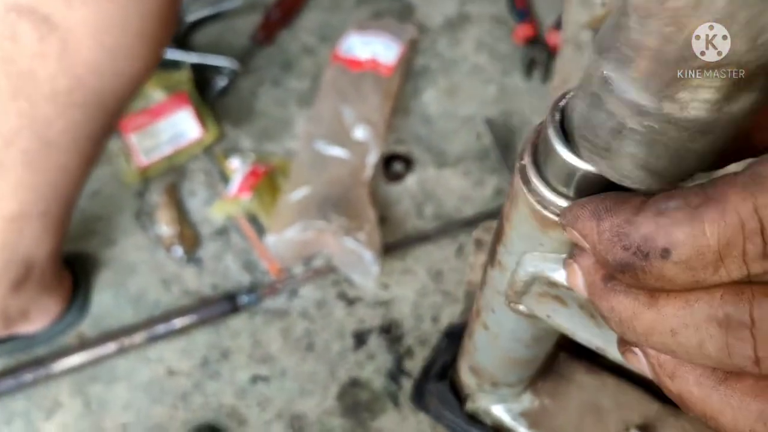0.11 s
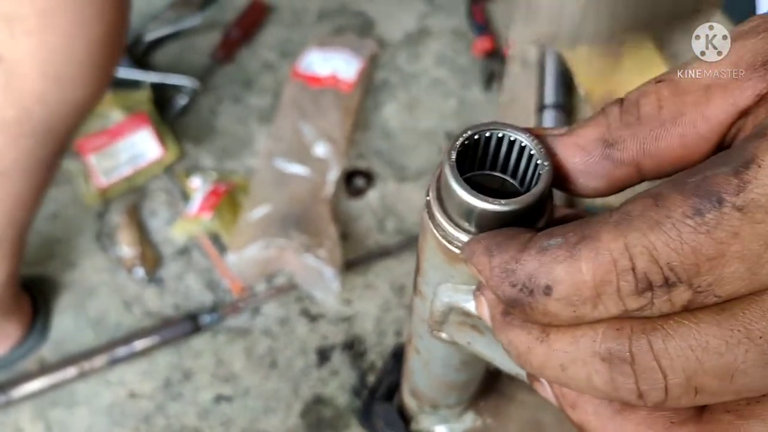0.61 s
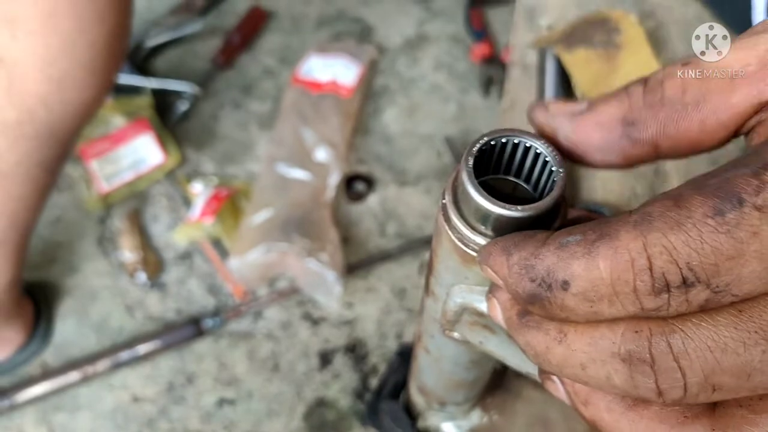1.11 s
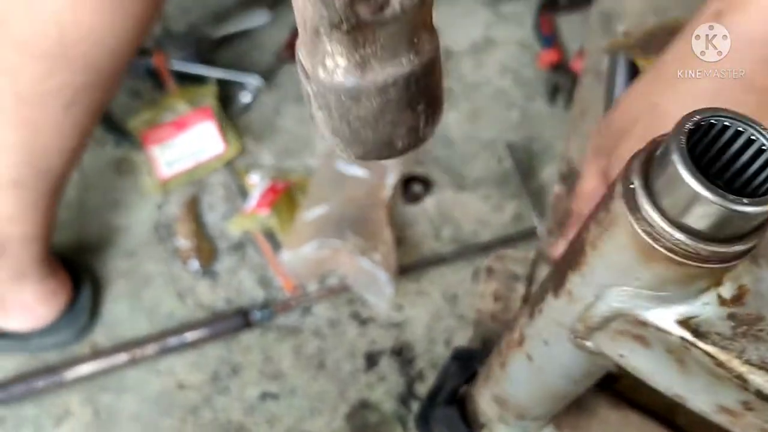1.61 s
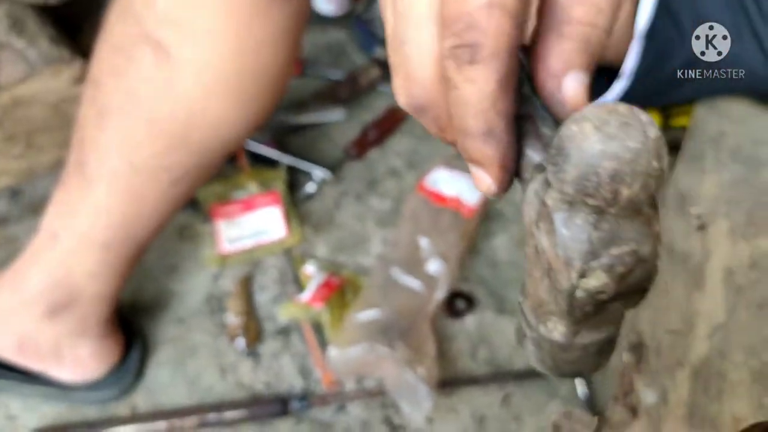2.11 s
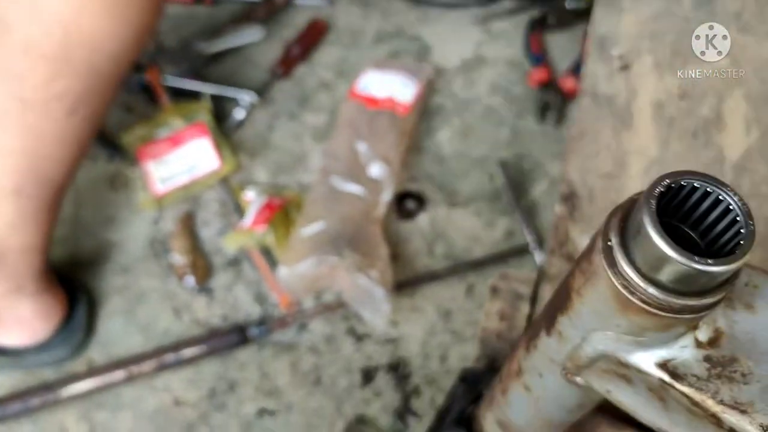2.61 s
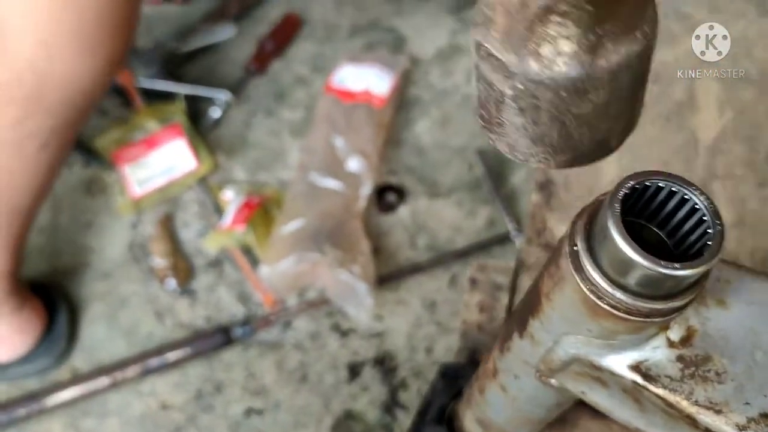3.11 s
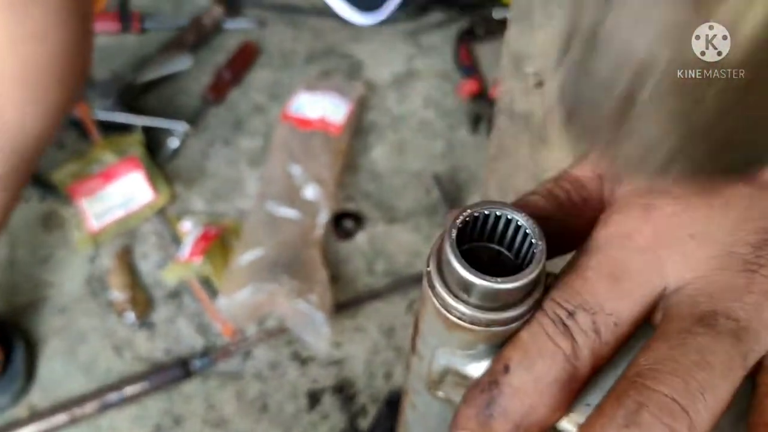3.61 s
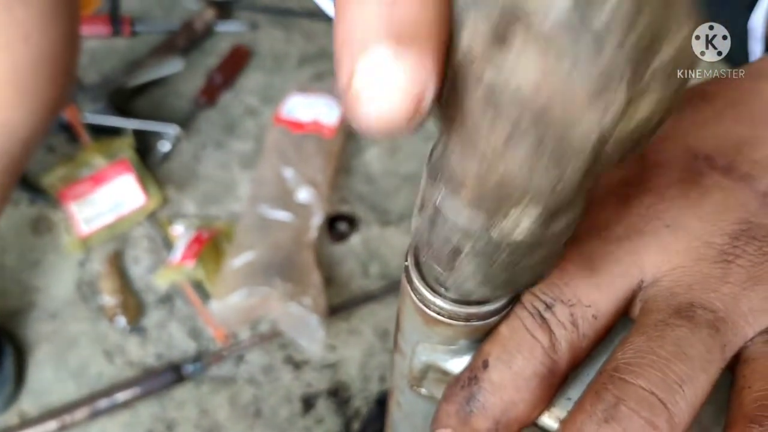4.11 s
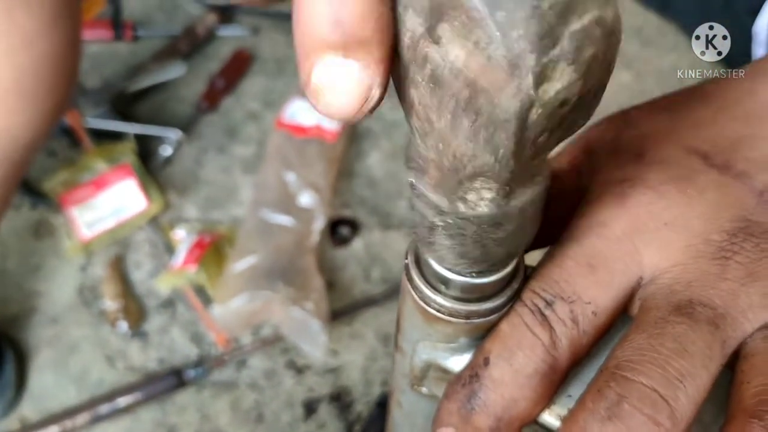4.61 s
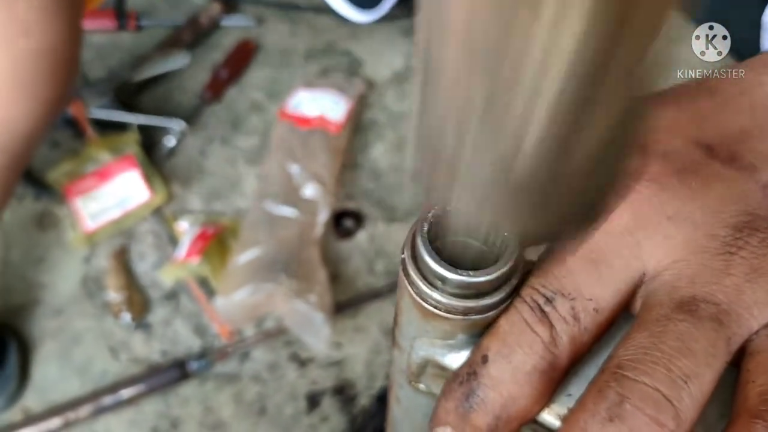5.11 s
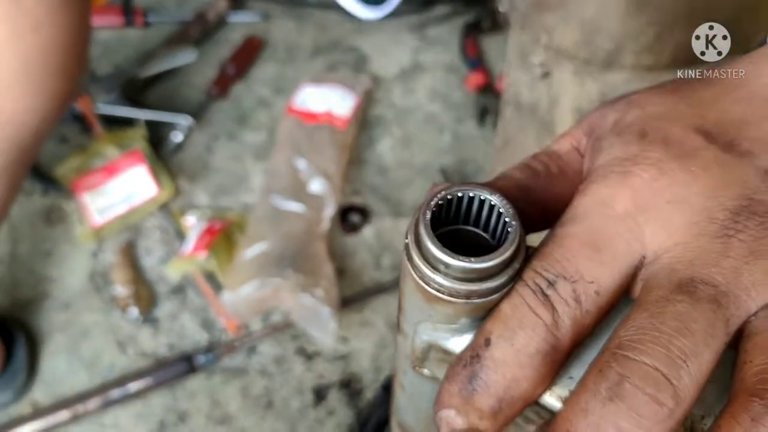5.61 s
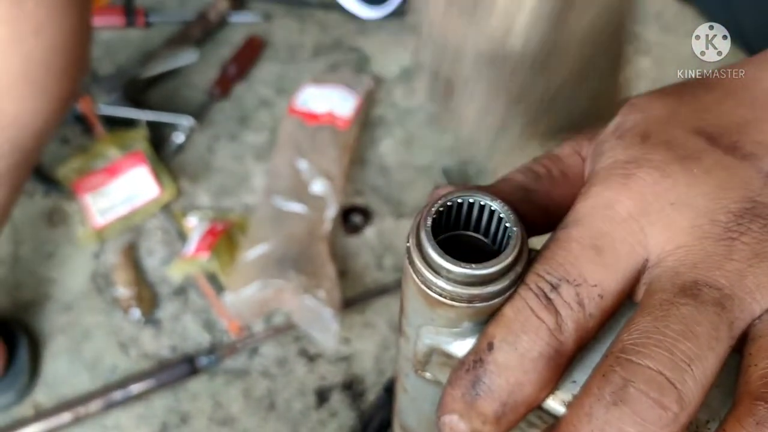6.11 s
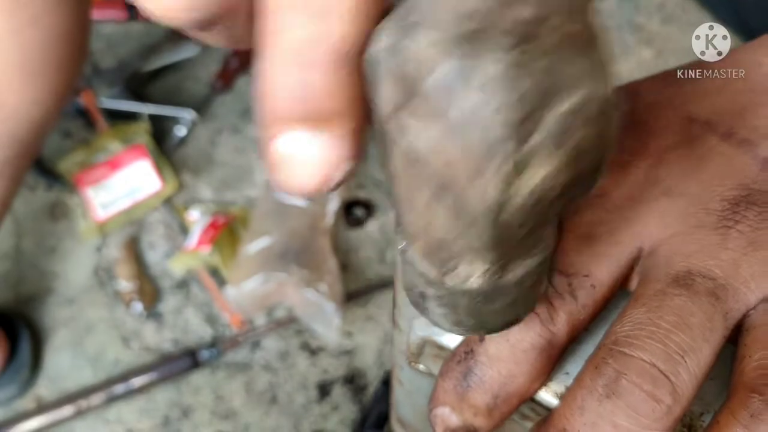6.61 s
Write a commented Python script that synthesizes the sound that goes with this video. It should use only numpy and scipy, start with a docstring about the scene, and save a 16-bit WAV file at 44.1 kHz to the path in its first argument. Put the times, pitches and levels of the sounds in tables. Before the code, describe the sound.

Rapid metallic hammering, heard very near in stereo with short, dense room reflections. The first second has hollow, clanking blows and a ringing bearing. Then about two and a half seconds of light handling: dull small knocks, rustling, a small tool clinking, weak squeaks. Regular hammer blows return, tighter and drier as the bearing seats, over a barely audible low floor with hum.

```python
"""A hammer drives a needle bearing into the steel pivot tube of a frame, close by in a small workshop. Each
blow is a hard contact with a short rattle: noise bursts that ring the modes of tube and frame. Once the loose
bearing jumps, knocks as it bounces, and rings free: single clicks set its modes ringing. In the pause hands
shift the frame and tools: small knocks, clinks, squeaks and rustle, from shaped noise and tones. Noise
reflections make the room; below it all lies a very quiet floor with hum."""
import sys
import numpy as np
from scipy import signal
from scipy.fft import rfft, irfft, next_fast_len
from scipy.io import wavfile
from scipy.ndimage import uniform_filter1d

SR = 44100
rng = np.random.default_rng(int(sys.argv[2]) if len(sys.argv) > 2 else 0)


def volts_from_db(level):
    """Convert decibel levels to linear amplitude ratios."""
    exponent = np.asarray(level, float) / 20
    return 10 ** exponent


def wrap_up_sound(samples):
    """Save the sound to the file named by the first command line argument, as 16-bit audio."""
    columns = np.atleast_2d(samples).T
    # keep every value between -1 and 1, then stretch to whole-number steps
    tamed = np.clip(columns, -1, 1)
    steps = np.round(tamed * 32767).astype(np.int16)
    wavfile.write(sys.argv[1], SR, steps)


N = 297675
LEAD = round(.15 * SR)   # samples computed before the start, so that an earlier blow can die away


def at_hz(points, hz, axis=1):
    """Reads a table at one or more pitches, with straight lines on a log-frequency axis."""
    points = np.array(points, float)
    return np.interp(np.log(hz), np.log(points[:, 0]), points[:, axis])


def band(x, low_hz, high_hz):
    """Butterworth band-pass: keeps what lies between two frequencies."""
    return signal.sosfilt(signal.butter(2, [low_hz, high_hz], "band", fs=SR, output="sos"), x)


def half_octaves():
    """Lower edge, upper edge and middle (Hz) of bands half an octave wide."""
    edges = 25 * 2 ** np.arange(0, 9.6, .5)
    return [(low, high, np.sqrt(low * high)) for low, high in zip(edges, edges[1:])]


def ring(force, hz, t60):
    """One mode: a unit click sets a sine of height 1 ringing, which fades by 60 dB in t60 seconds."""
    r, w = volts_from_db(-60 / (t60 * SR)), 2 * np.pi * hz / SR
    # the tiny constant keeps the filter away from very slow, near-zero numbers
    return signal.lfilter([0, np.sin(w)], [1, -2 * r * np.cos(w), r * r], force + 1e-18)


def place(times, shapes):
    """Lays one short shape at each time on a line that starts early."""
    length = shapes.shape[1]
    line = np.zeros(LEAD + N + length)
    starts = np.round(np.array(times) * SR).astype(int) + LEAD
    np.add.at(line, starts[:, None] + np.arange(length), shapes)
    return line[:LEAD + N]


def sides(x, spread_db, count=4):
    """A vibration pattern radiates unevenly and may reach the right microphone a few samples later."""
    lean_db, lag = rng.normal(0, spread_db), rng.integers(0, count)
    return np.array([volts_from_db(lean_db / 2) * x, volts_from_db(-lean_db / 2) * np.roll(x, lag)])


def strike(touches, modes, scatter_db, count=4):
    """Single clicks ring every mode of a body; scatter_db varies the strength from mode to mode."""
    s, level_db = np.transpose(touches)
    out = 0
    for hz, mode_db, t60 in modes:
        clicks = volts_from_db(level_db + mode_db + rng.normal(0, scatter_db, len(s)))
        out = out + sides(ring(place(s, clicks[:, None]), hz, t60), scatter_db, count=count)
    return out


# tilt of the noise floor: f/Hz, level/dB (per Hz, relative)
FLOOR_COLOUR = [(18, -34.5), (30, -10), (252, -6), (666, -15), (2750, -21), (3140, -35), (8080, -37.5),
                (12300, -29), (16000, -28.5)]
# mains hum tones: f/Hz, level/dB (peak of the sine)
HUM_TONES = [(49, -87), (100, -100), (151, -104), (251, -84)]
FLOOR_DB = -80.5   # rms of the noise


def quiet():
    """Faint noise floor, mostly low, with mains hum as a few steady sines."""
    hz = np.fft.rfftfreq(N, 1 / SR) + 1
    noise = irfft(rfft(rng.standard_normal((2, N))) * volts_from_db(at_hz(FLOOR_COLOUR, hz)), N)
    t, hum = np.arange(N) / SR, 0
    for f, level_db in HUM_TONES:
        hum = hum + volts_from_db(level_db) * np.sin(2 * np.pi * f * t + rng.uniform(0, 2 * np.pi, (2, 1)))
    return volts_from_db(FLOOR_DB) * noise / noise.std() + hum


# how the room answers: f/Hz, level/dB (relative), t60/s (time to fade by 60 dB)
ROOM_ECHO = [(40, -10.5, 0.26), (201, -2, 0.23), (700, 6, 0.17), (2820, -6.5, 0.17), (6800, 1.5, .14),
             (11000, -3, 0.11), (15000, 1, 0.14)]


def workshop(x):
    """Dense reflections from floor and clutter: noise dying band by band, another for each microphone."""
    t, echo = np.arange(round(.5 * SR)) / SR, 0
    for low, high, hz in half_octaves():
        t60 = at_hz(ROOM_ECHO, hz, axis=2)
        fade = volts_from_db(at_hz(ROOM_ECHO, hz) - 60 * t / t60) * np.clip(t / 0.0016, 0, 1)
        per_energy = np.sqrt(t60 * SR / (6 * np.log(10)))   # a longer fade does not make it louder
        echo = echo + band(rng.standard_normal((2, len(t))), low, high) * fade / per_energy
    size = next_fast_len(x.shape[1] + len(t))
    return irfft(rfft(x.mean(axis=0), size) * rfft(echo, size), size)[:, :x.shape[1]]


JOLT_DB, JOLT_HZ = -55, (20, 60)   # relative strength and band of the push


def jolts():
    """Each blow shakes the floor under the microphones: a short low push, unrelated at the two."""
    s = np.transpose(BLOW_LIST)[0]
    pushes = volts_from_db(JOLT_DB) * rng.standard_normal((len(s), 2))
    low_hz, high_hz = JOLT_HZ
    return np.array([band(place(s, push[:, None] * SR / high_hz), low_hz, high_hz) for push in pushes.T])


# hands and cloth brush past: start t/s, length/s, fine rustle level/dB, dry rubbing level/dB
BRUSH_LIST = [(1.298, 0.09, -55, -83), (1.51, .04, -90, -73.5), (1.71, .12, -72.5, -71.5),
              (1.829, 0.05, -68.5, -58), (1.913, .01, -50, -63), (1.95, 0.29, -65.5, -66.5),
              (2.273, 0.018, -60, -66), (2.326, 0.016, -58, -56.5), (2.43, 0.063, -56, -52.5),
              (2.638, 0.07, -80.5, -67), (2.75, 0.017, -76, -71), (3.042, 0.025, -59.5, -57.5),
              (3.097, 0.054, -77, -68), (3.164, 0.046, -57.5, -59.5), (3.29, .2, -95, -84),
              (3.469, 0.073, -70.5, -97.5), (3.59, .04, -92, -73)]
BRUSH_RISE_S, BRUSH_FADE_DB_PER_S, SCUFF_UNDER_RUB_DB = .012, 331, 20
FRAME_RUBS_PER_S, FRAME_RUB_DB = 300, -6   # the rubbing also sets the frame's modes murmuring


def rustle():
    """Dense tiny contacts under the hands, heard in three registers; each brush rises, holds and fades."""
    start, length, fine_db, rub_db = np.transpose(BRUSH_LIST)
    t, out = np.arange(N) / SR, 0
    coarse = np.arange(0, N, 32) / SR   # slow changes are worked out every 32 samples
    age = coarse - start[:, None]
    fade_db = BRUSH_FADE_DB_PER_S * np.maximum(age - length[:, None], 0)
    shape = np.clip(age / BRUSH_RISE_S, 0, 1) * volts_from_db(-fade_db)
    # scuff, rub and rustle: level, band (Hz), how alike the two microphones are
    registers = [(rub_db - SCUFF_UNDER_RUB_DB, 400, 2700, .7),
                 (rub_db, 2000, 5550, .4),
                 (fine_db, 5000, 19845, .2)]
    for level_db, low, high, alike in registers:
        # a few grains are far stronger than the rest
        grains = rng.standard_normal((3, N)) * volts_from_db(4.0 * np.minimum(rng.exponential(1, N), 4))
        steps = np.arange(0, 7, .03)
        patches_db = 5.0 * np.interp(t, steps, rng.standard_normal(len(steps)))   # contact comes and goes
        mixed = alike * grains[0] + (1 - alike) * grains[1:]
        x = volts_from_db(patches_db) * band(band(mixed, low, high), low, high)
        out = out + x / x.std() * np.interp(t, coarse, volts_from_db(level_db) @ shape)
    rubs = (rng.random(N) < FRAME_RUBS_PER_S / SR) * rng.standard_normal(N)
    rubbing = rubs * np.interp(t, coarse, volts_from_db(rub_db) @ shape)
    frame = sum(volts_from_db(mode_db + rng.normal(0, 3.0)) * ring(rubbing, hz, t60)
                for hz, mode_db, t60 in TUBE_MODES)
    return out + volts_from_db(FRAME_RUB_DB) * band(frame, 480, 9000)


# soft short tones: start t/s, length/s, level/dB (relative), from f/Hz, to f/Hz
SQUEAK_LIST = [(1.39, 0.054, -74, 720, 680), (1.507, 0.046, -66.5, 588, 570),
               (2.85, 0.26, -85.5, 1577, 1577), (3.083, 0.032, -60, 2800, 2800),
               (3.063, .15, -65.5, 1400, 1400), (3.118, .05, -66, 2350, 2350),
               (3.543, 0.055, -58, 1403, 1075)]


def squeaks():
    """Soft tones, some gliding, that swell and fade; slow random changes make their level unsteady."""
    out = np.zeros(LEAD + N)
    for s, length, level_db, from_hz, to_hz in SQUEAK_LIST:
        u = np.linspace(0, 1, round(length * SR))   # 0 at the start, 1 at the end
        points = len(u) // 250
        waver = 0.7 + np.interp(u, np.linspace(0, 1, points), rng.standard_normal(points))
        phase = 2 * np.pi * np.cumsum(from_hz + (to_hz - from_hz) * u) / SR
        swell = np.abs(np.sin(np.pi * u))
        out += place([s], (volts_from_db(level_db + 4) * swell * waver * np.sin(phase))[None])
    return out


# small knocks: up to 1.23 s the loose bearing bouncing, later things being shifted: t/s, level/dB (relative),
# f/Hz, brightness level/dB (relative)
KNOCK_LIST = [(1.033, -23, 700, -12.5), (1.048, -24, 666, -20), (1.056, -30, 595, 3),
              (1.186, -30, 1800, -8), (1.214, -35.5, 690, -5.5), (1.229, -38, 900, -14.5),
              (1.714, -45, 5000, -31), (1.842, -39, 660, -22), (1.866, -37, 710, -14),
              (1.914, -27, 4770, -17), (2.007, -44.5, 1630, -12.5), (2.054, -40, 860, -31),
              (2.141, -31.5, 810, -38), (2.161, -35, 716, -23), (2.194, -38, 800, -35),
              (2.278, -48.5, 1880, -16), (2.328, -40.5, 4190, -13), (2.419, -32.5, 1780, -33),
              (2.433, -30.5, 885, -30), (2.44, -35.5, 4550, -10), (2.463, -30.5, 1090, -16),
              (2.478, -43, 670, -3), (2.661, -41.5, 1990, -39), (2.709, -36, 1410, -35),
              (2.733, -41.5, 1420, -33), (2.757, -33.5, 1420, -32.5), (3.043, -34.5, 735, -13.5),
              (3.057, -48, 643, -2), (3.165, -51, 1400, -2.5)]
KNOCK_T60_S = .03   # fade of the weaker, longer part


def knocks():
    """Each knock is a scratchy tick on a dull body: noise dying in a broad resonance."""
    out = np.zeros(LEAD + N)
    t = np.arange(round(.15 * SR)) / SR
    fade = np.exp(-t / 0.0017) + volts_from_db(-19 - 60 * t / KNOCK_T60_S)
    for s, level_db, hz, bright_db in KNOCK_LIST:
        noise = rng.standard_normal((2, len(t))) * fade
        body = band(noise[0], hz / 1.4, hz * 1.485) * np.sqrt(SR / 2 / hz)
        tick = volts_from_db(bright_db + 13.5) * band(noise[1], 2400, 17000)
        out += place([s], volts_from_db(level_db - 3) * (body + tick)[None])
    return out


# a small tool is touched: t/s, level/dB
CLINK_TOUCHES = [(1.914, -47), (2.435, -40.5)]
# modes of the tool: f/Hz, level/dB (relative), t60/s
TOOL_MODES = [(4760, -7.5, 0.28), (12520, 7.5, 0.14)]


def clinks():
    """Light touches, each a single click, ring the modes of a small tool."""
    return strike(CLINK_TOUCHES, TOOL_MODES, scatter_db=2)


# touches of the loose bearing as it jumps: t/s, level/dB
BEARING_TOUCHES = [(1.036, -39), (1.057, -24.5), (1.123, -27), (1.187, -39.5)]
# modes of the bearing, the close pair beats: f/Hz, level/dB (relative), t60/s
BEARING_MODES = [(1696, -14, .3), (4460, -13, .22), (8651, 0, .2), (8666, -.5, .2), (14230, -6, .45)]


def loose_bearing():
    """The bearing jumps and rings free: every touch clicks all its modes, equally timed at both sides."""
    return strike(BEARING_TOUCHES, BEARING_MODES, scatter_db=.5, count=1)


# hammer blows: t/s, sizzle level/dB (hardness), tube ring level/dB, arm ring level/dB (all relative)
BLOW_LIST = [(0.0755, -30, -18, -32.5), (0.2488, -27, -13, -37), (0.4237, -29, -16, -34.5),
             (0.604, -21, -9, -37), (0.7783, -25, -15.5, -49), (0.9542, -30, -14.5, -40),
             (1.1219, -26.5, -8, -28), (3.6303, -24.5, -12, -33), (3.8212, -31.5, -12.5, -30.5),
             (4.0044, -26.5, -14.5, -34), (4.1908, -31.5, -20.5, -33.5), (4.37, -27, -11.5, -35),
             (4.5531, -30, -12, -37), (4.7349, -30, -15.5, -42), (4.9101, -28, -14.5, -45),
             (5.0898, -28.5, -16.5, -34), (5.2667, -25, -12.5, -35.5), (5.4454, -30, -17.5, -32),
             (5.6217, -28.5, -18.5, -30.5), (5.796, -28, -17, -33.5), (5.9742, -28, -14, -31),
             (6.148, -25.5, -13.5, -32.5), (6.3229, -33, -17, -29.5), (6.5521, -28.5, -13.5, -33.5),
             (6.7295, -25, -11.5, -28)]
# a blow before the start, only its tail is heard: same columns
BLOW_BEFORE = (-.1, -27, -12, -35)
# where thud, tube ring, clank and sizzle sit: f/Hz
COLOUR_HZ = [900, 3000, 6000, 11000]
# modes of tube and frame: f/Hz, level/dB (relative), t60/s
TUBE_MODES = [(172, -31, .15), (194, -16, .6), (245, -29, .3), (575, -16, .05), (640, -22, .04),
              (743, -8, .09), (790, -4, .06), (860, -10, .1), (960, -15, .04), (1440, -11, .04),
              (1523, -19, .04), (2153, -18, .07), (2347, -22, .04), (2676, -13, .05), (3498, -13, .04),
              (3639, -14, .06), (4075, -16, .04), (4290, -16, .06), (2826, -12, .08), (3035, 2, .04),
              (3124, -2, .035), (3190, -7, .04), (5097, -10, .03), (5820, -3, .025), (6050, -5, .025),
              (7220, -12, .03)]
# the long arm of the frame hangs free and rings on: f/Hz, level/dB (relative), t60/s
ARM_MODES = [(1767, -13, .38), (1873, -1, .42), (1955, -7, .2)]
# colour of the contact noise: f/Hz, level/dB (per Hz, relative)
CRACK_COLOUR = [(30, -20), (100, -54), (250, -25.5), (450, -22), (750, -2), (1000, -3), (1500, -13.5),
                (3000, -10), (5000, -7.5), (8000, -7), (10500, .5), (15000, -1.5)]
# while the bearing stands proud, its open shell adds a hollow note: until t/s, f/Hz, width/octaves, level/dB
PROUD_SHELL = (2.0, 1470, 0.34, 13.76)
# as the bearing seats, from the first blow to the last:
THUD_DB = (-26, -31)   # the frame thuds less
CLANK_OVER_SIZZLE_DB = (7, 17)   # the clank grows
RATTLE_S = (0.026, .019)   # the rattle shortens


def hammer():
    """A hard rough contact, then bearing and needles rattle for some milliseconds; all drives the modes."""
    s, sizzle_db, tube_db, arm_db = np.transpose([BLOW_BEFORE] + list(BLOW_LIST))
    seating = (THUD_DB, CLANK_OVER_SIZZLE_DB, RATTLE_S)
    thud_db, clank_db, rattle_s = (np.linspace(*ends, len(s)) for ends in seating)
    t = np.arange(round(.06 * SR)) / SR
    noise = rng.standard_normal((len(s), 2, len(t)))
    contact = noise[:, 1] * np.exp(-t / 0.004) * np.minimum(t / .0008, 1)
    touches = (np.abs(noise[:, 0]) > 1.8) * noise[:, 1]   # scattered single hits
    rattle = touches * np.exp(-(t / rattle_s[:, None]) ** 3)
    push = np.exp(-t / .001)   # the push of the blow itself, felt by the low modes
    force = volts_from_db(-12) * contact + volts_from_db(-10) * rattle + volts_from_db(-21) * push
    colours = np.transpose([thud_db, tube_db, sizzle_db + clank_db, sizzle_db])
    until, shell_hz, octaves, shell_db = PROUD_SHELL

    def tone_db(hz):
        """Level of every blow at one frequency."""
        shell = (s < until) * shell_db * np.exp(-(np.log2(hz / shell_hz) / octaves) ** 2)
        return shell + np.array([np.interp(np.log(hz), np.log(COLOUR_HZ), c) for c in colours])

    out = strike(np.transpose([s, arm_db]), ARM_MODES, scatter_db=0.0)
    for hz, mode_db, t60 in TUBE_MODES:
        gain = volts_from_db(tone_db(hz) + mode_db - 13.5 + rng.normal(0, 3.0, len(s)))
        out = out + sides(ring(place(s, gain[:, None] * force), hz, t60), 1)
    for low, high, hz in half_octaves():   # the noise of the contact itself
        gain = volts_from_db(tone_db(hz) + at_hz(CRACK_COLOUR, hz) + 20.5)
        out = out + sides(band(place(s, gain[:, None] * force), low, high), 0.61, count=8)
    return out


def scene():
    """Small bodies radiate little bass straight to the microphones; the room carries it."""
    blows = volts_from_db(1) * hammer()
    small = clinks() + sides(knocks() + squeaks(), 1.5)
    bearing = loose_bearing()
    direct = band(blows + small, 200, 17000) + bearing
    room = workshop(blows + volts_from_db(-4) * small + volts_from_db(-9) * bearing)
    return (direct + jolts() + room)[:, LEAD:] + rustle() + quiet()


def low_pass(x):
    """Removes everything above the highest recorded frequency."""
    return signal.sosfilt(signal.butter(12, 16720, fs=SR, output="sos"), x)


LIMIT_DB = -10   # peaks above this are turned down
HELD_FALL_DB_PER_S = 260.5   # how fast the held excess falls; the cut is 0.8 of it


def record(dry):
    """A limiter holds the blows down and lets go within tens of milliseconds; the top is cut."""
    over_db = np.maximum(20 * np.log10(np.abs(dry).max(axis=0) + 1e-9) - LIMIT_DB, 0)
    fall_db = HELD_FALL_DB_PER_S * np.arange(N) / SR
    held_db = np.maximum.accumulate(over_db + fall_db) - fall_db
    ahead = round(.001 * SR)
    smooth_db = uniform_filter1d(held_db, 2 * ahead, origin=-ahead // 2)   # begins before the peak
    limited = dry * volts_from_db(-.8 * smooth_db)
    mix = signal.sosfilt(signal.cheby2(10, 50, 16400, fs=SR, output="sos"), limited)
    return low_pass(mix)


dry = scene()
out = record(dry)
wrap_up_sound(out)
```